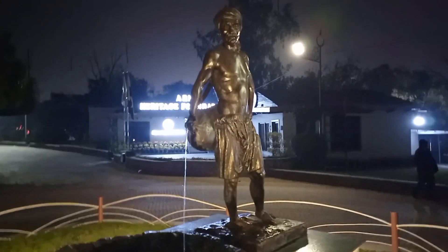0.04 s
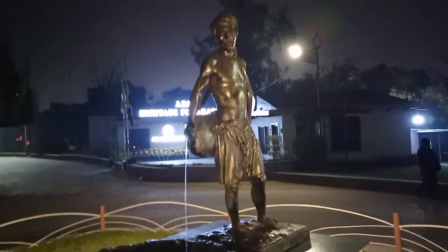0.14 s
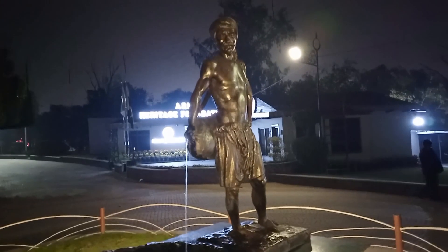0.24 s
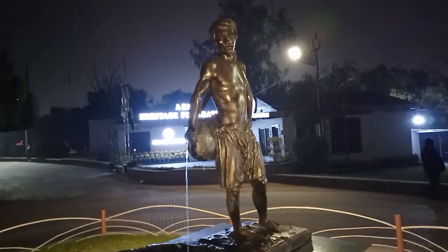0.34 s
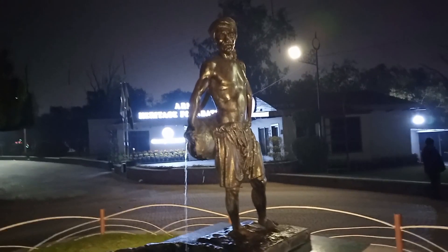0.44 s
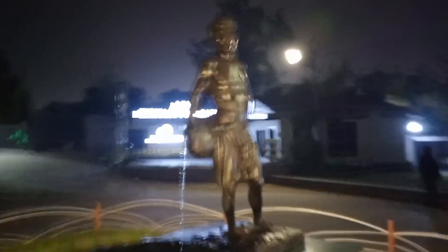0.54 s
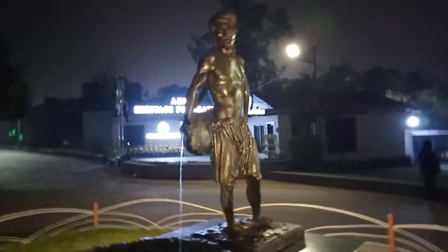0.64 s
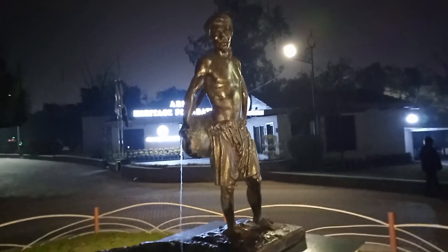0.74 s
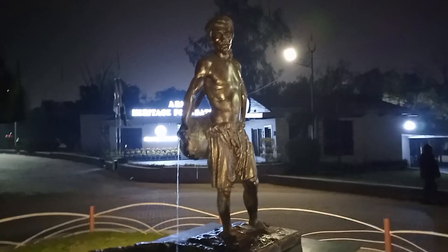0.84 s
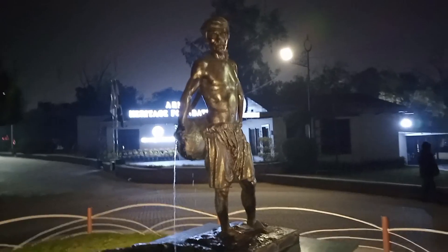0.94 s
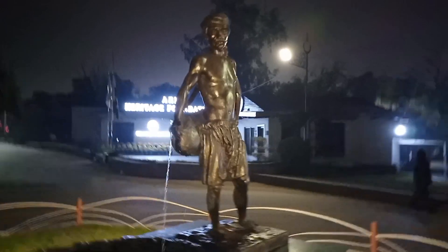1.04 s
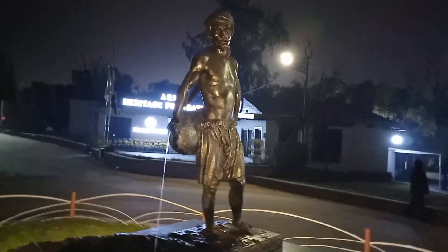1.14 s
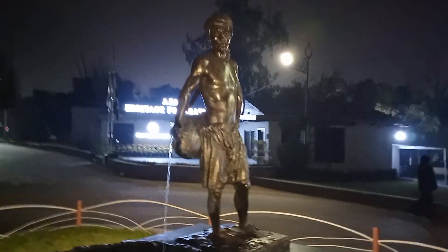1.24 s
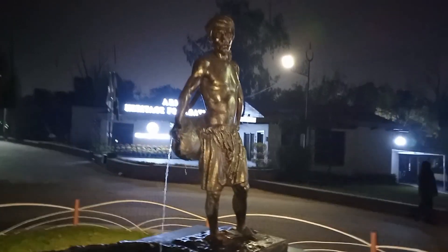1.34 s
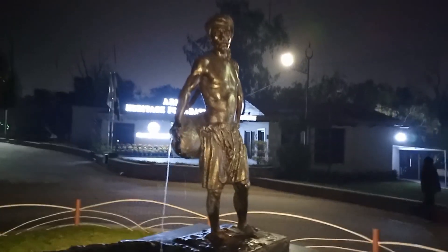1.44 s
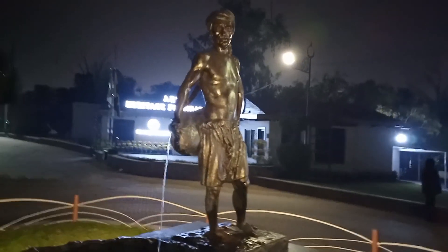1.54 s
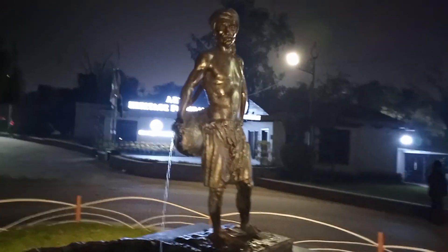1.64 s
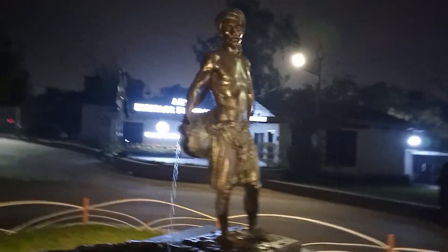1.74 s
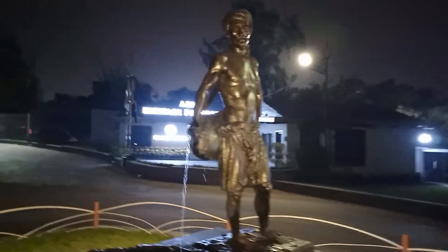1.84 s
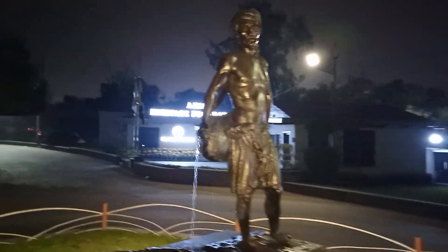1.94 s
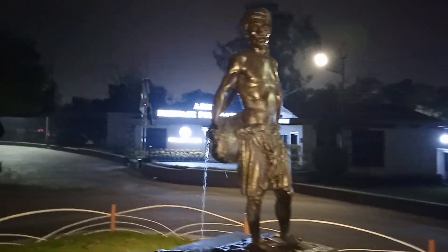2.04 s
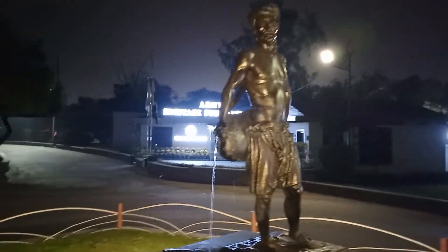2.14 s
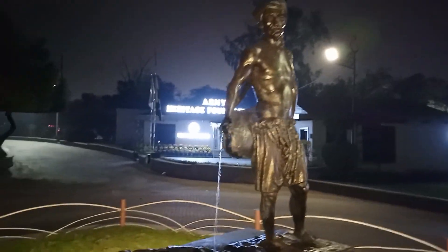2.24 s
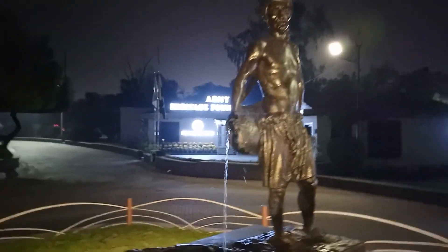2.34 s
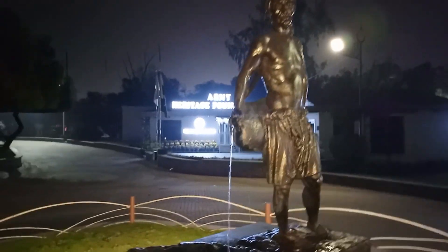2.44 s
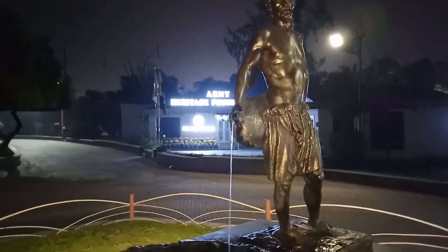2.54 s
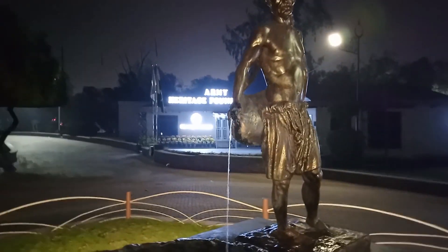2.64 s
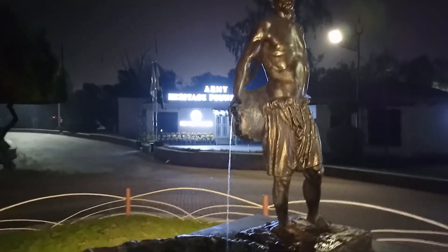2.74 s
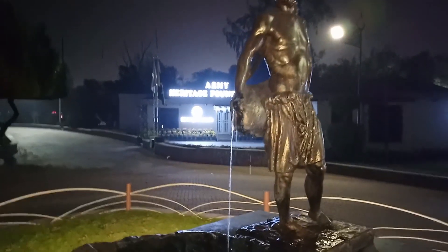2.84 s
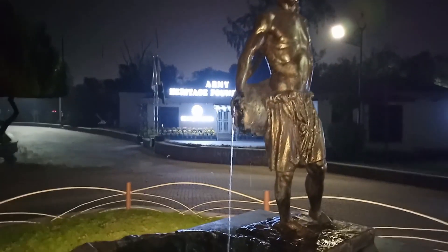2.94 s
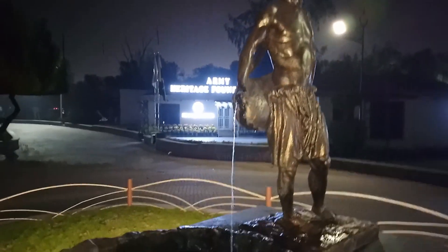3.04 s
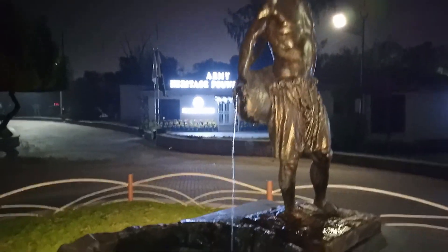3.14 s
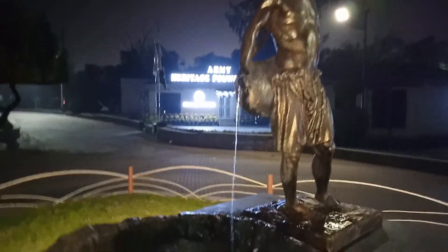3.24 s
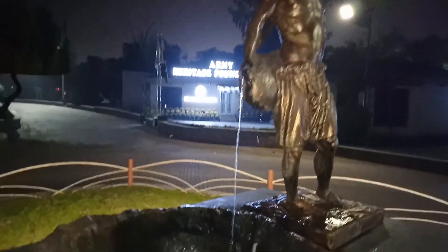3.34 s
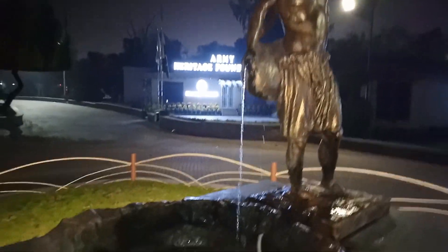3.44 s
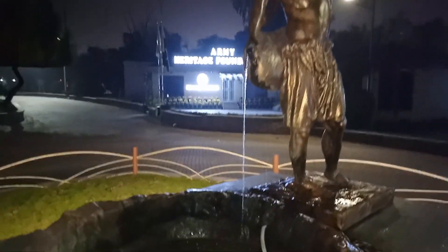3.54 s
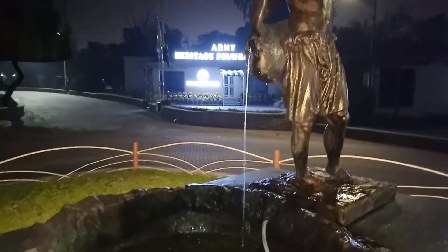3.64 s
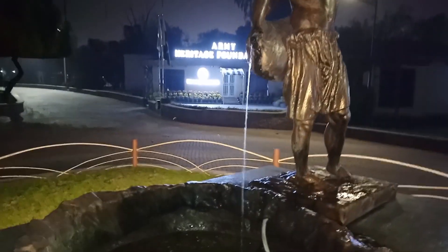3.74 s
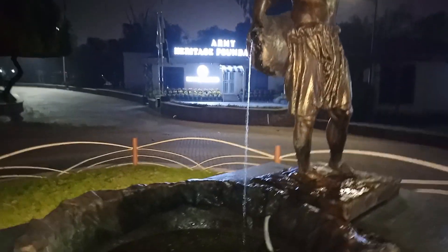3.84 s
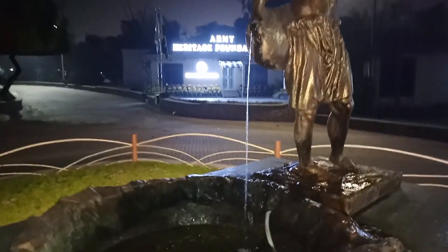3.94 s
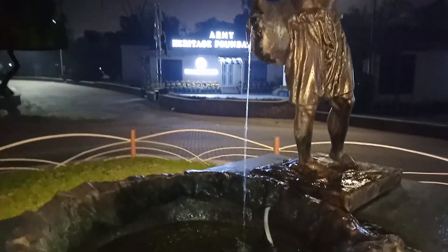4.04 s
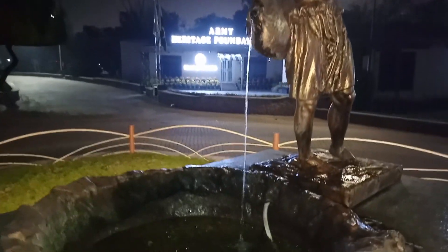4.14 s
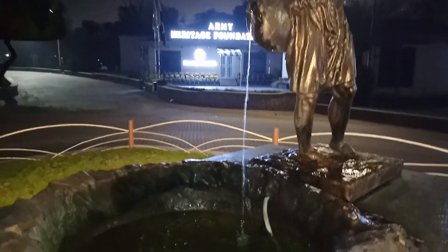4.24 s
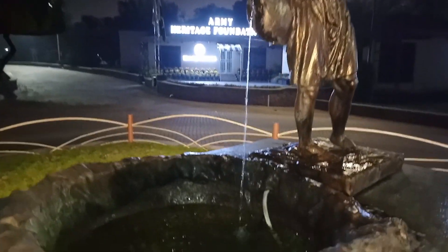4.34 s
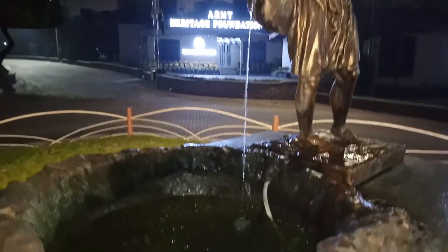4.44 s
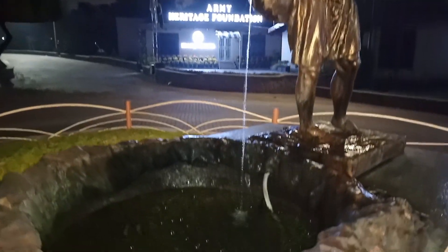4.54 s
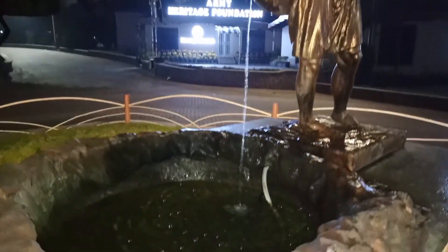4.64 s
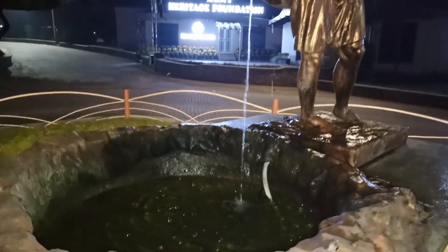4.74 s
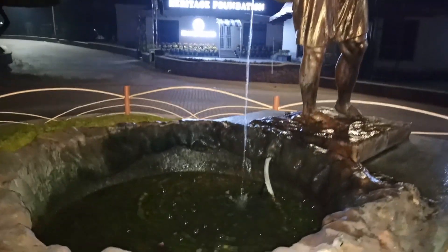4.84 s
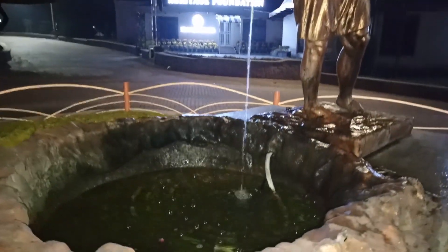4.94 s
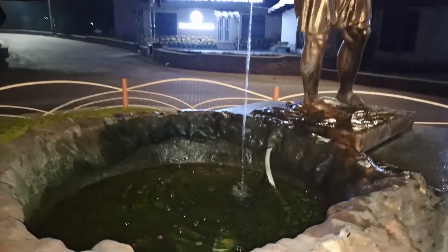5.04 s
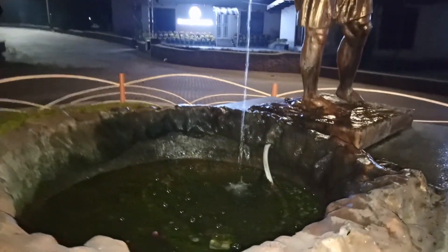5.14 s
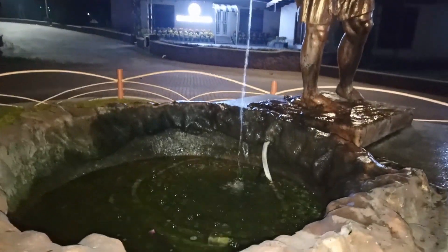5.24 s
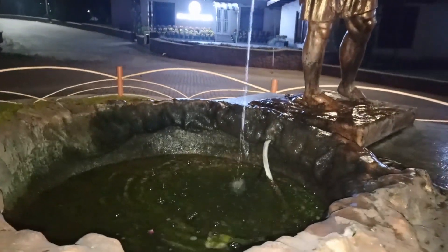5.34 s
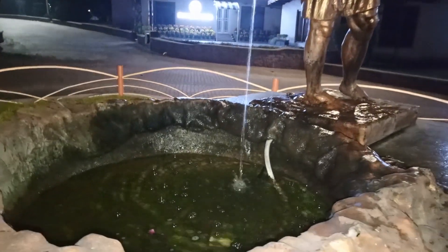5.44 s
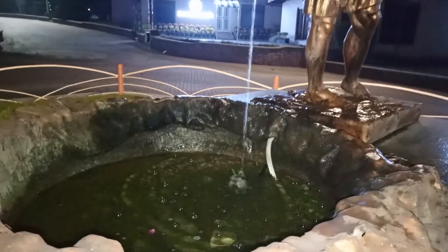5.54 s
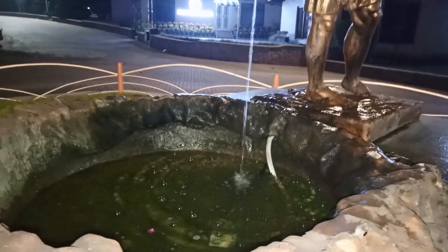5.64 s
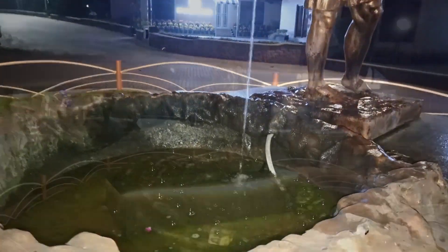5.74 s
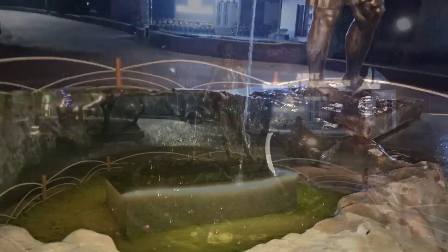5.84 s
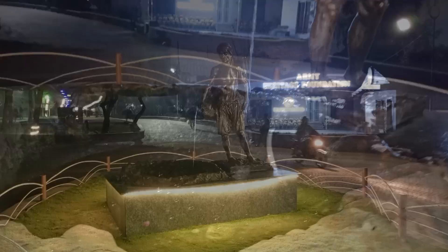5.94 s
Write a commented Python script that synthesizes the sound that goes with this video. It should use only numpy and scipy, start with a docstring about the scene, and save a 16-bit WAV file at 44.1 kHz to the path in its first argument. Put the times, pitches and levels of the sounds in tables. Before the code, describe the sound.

A thin stream of water splashes steadily into a stone basin, with bubbling, low glugs and a faint rumble.

```python
"""A thin stream falls into a stone basin at night and breaks into slugs of water. From the start each slug
cracks on the surface, throws spray and traps small bubbles; larger air pockets glug, the walls echo and
a noise gate cuts a low rumble in and out. From 0.7 s faint tones sound now and then. At 2.2-2.7 s the
microphone tips toward the water and treble notches from the rim fill in. The splashes are loudest from
about 4.3 s on."""
import sys
import numpy as np
from scipy import signal
from scipy.fft import rfft, irfft, next_fast_len
from scipy.io import wavfile
from scipy.ndimage import uniform_filter1d

SR = 44100
rng = np.random.default_rng(int(sys.argv[2]) if len(sys.argv) > 2 else 0)


def materialize(psi):
    """Save the field psi as 16-bit PCM at rate SR to the path in sys.argv[1].

    A 1-D psi becomes a single channel; in a 2-D psi each row is a channel.
    """
    bounded = np.clip(np.atleast_2d(psi).T, -1, 1)
    quanta = np.round(bounded * 32767).astype(np.int16)
    wavfile.write(sys.argv[1], SR, quanta)


N = 263718

# Slug impacts: start_s, level_db, pitch_hz, spray_db
SLUGS = [(0.023, -8.5, 2660, -25), (0.071, -6.5, 4120, -29), (0.0957, -26, 2210, -29),
         (0.172, -12.5, 2270, -37), (0.2, -13, 3440, -29), (0.2906, -7, 4490, -25),
         (0.3196, -16, 1720, -49), (0.3371, -11, 2120, -44), (0.382, -12, 4130, -32),
         (0.4546, -7.5, 1550, -19), (0.489, -16, 2100, -35), (0.51, -10, 2070, -20),
         (0.539, -13, 4500, -25), (0.6095, -10.5, 5340, -34), (0.5931, -8.5, 2200, -42),
         (0.626, -2.5, 3000, -21.5), (0.6821, -7.5, 3830, -38), (0.777, -16.5, 3420, -29),
         (0.8174, -11.5, 3840, -42), (0.85, -9, 1730, -36), (0.8713, -3.5, 5900, -19),
         (0.92, -6.5, 1520, -36), (0.946, -11.5, 1500, -30), (0.988, -17, 1710, -35),
         (1.0078, -8.5, 2830, -19), (1.0333, -9, 2070, -43), (1.077, -8, 2200, -48),
         (1.0955, -8, 3930, -30), (1.109, -7, 4800, -19), (1.228, -19, 2570, -33),
         (1.2535, -14.5, 1810, -29), (1.3207, -15, 3550, -39), (1.334, -11.5, 2040, -26),
         (1.3642, -14.5, 4410, -17), (1.423, -10.5, 3530, -44), (1.4426, -3, 3770, -22),
         (1.5253, -10, 4580, -28), (1.5713, -16, 3720, -52), (1.6, -11, 4970, -40),
         (1.6326, -9.5, 2550, -29), (1.643, -10, 4260, -35), (1.6797, -5, 4340, -22),
         (1.722, -12, 2230, -45), (1.7524, -9, 4570, -41), (1.7705, -9, 3470, -45),
         (1.8193, -9.5, 3470, -33), (1.8488, -1.5, 4170, -29), (1.871, -4.5, 3900, -23),
         (1.9516, -6, 4000, -13.5), (2.0236, -16, 4230, -28), (2.024, -23, 1860, -29),
         (2.04, -9.5, 1780, -36), (2.07, -15, 2820, -49), (2.086, -5.5, 1820, -43),
         (2.2166, -8.5, 4500, -40), (2.243, -12, 2390, -26), (2.2936, -12, 3500, -37),
         (2.369, -1.5, 2870, -22), (2.422, -3.5, 3470, -28), (2.4584, -12, 1850, -27),
         (2.4783, -13, 2720, -33), (2.509, -1, 1930, -39), (2.526, -9, 4440, -25), (2.5535, -14, 5360, -42),
         (2.564, -11, 2900, -44), (2.5947, -7, 2500, -17), (2.607, -5, 2380, -38), (2.6336, -6, 1540, -34),
         (2.6539, -6, 4220, -20), (2.7094, -9, 3780, -39), (2.724, -11, 3500, -18.5),
         (2.751, -12, 4960, -22), (2.8033, -6, 3950, -38), (2.8186, -4.5, 4100, -39),
         (2.8884, -4, 3140, -20), (2.93, -10, 2760, -36), (2.9505, -1.5, 3300, -31),
         (2.9756, -3.5, 3100, -21), (3.029, -5.5, 1750, -31), (3.04, -5.5, 2700, -27),
         (3.0584, -7, 3480, -21), (3.0894, -20.5, 4040, -36), (3.1134, -18, 3600, -22),
         (3.136, -21, 1640, -40), (3.169, -8.5, 1650, -25), (3.179, -5.5, 1450, -26),
         (3.2425, -4.5, 1800, -22), (3.326, -11, 1670, -26), (3.3625, -2.5, 2520, -15.5),
         (3.4008, -10.5, 4600, -19), (3.417, -1.5, 3860, -26), (3.4394, -3, 1860, -20),
         (3.463, -9, 3460, -22), (3.5137, -17, 4740, -25), (3.5286, -0.5, 3500, -28),
         (3.551, -12, 5360, -37), (3.582, -10.5, 3650, -31), (3.6368, -3, 3280, -24),
         (3.682, -6.5, 2890, -31), (3.6998, -12.5, 3260, -16), (3.7533, -8, 3260, -20.5),
         (3.7817, -1, 3600, -19), (3.811, -19, 2000, -44), (3.8247, -1.5, 3080, -17),
         (3.8586, -12, 3820, -21), (3.8792, -5.5, 2600, -38), (3.923, -11, 2570, -41),
         (3.9568, -5.5, 3600, -28), (3.986, -12, 2170, -33), (4, -5, 1900, -21), (4.067, -11, 3450, -26),
         (4.0961, -8, 3280, -27), (4.117, -6, 3430, -25), (4.142, -6.5, 3330, -28), (4.2016, -6, 4300, -24),
         (4.214, -4.5, 5080, -19), (4.2319, -3, 5160, -25), (4.243, -5.5, 3270, -42),
         (4.272, -9.5, 3730, -37), (4.2896, 1, 4100, -30), (4.3086, -6.5, 1740, -30),
         (4.338, -7.5, 1780, -29), (4.357, -7, 4970, -22), (4.385, -13, 5600, -26), (4.4016, -3, 2600, -39),
         (4.421, -4, 4800, -24), (4.496, -16, 3290, -31), (4.546, -20, 2510, -27), (4.5924, -18, 3590, -24),
         (4.6133, -0.5, 2750, -57), (4.6449, -5, 1670, -28), (4.6775, 1.5, 6400, -18),
         (4.7033, -8, 4500, -19), (4.7143, -13, 3300, -42), (4.726, -4.5, 1590, -32),
         (4.747, -3.5, 3540, -18.5), (4.7727, -8, 5270, -24), (4.803, -17, 3480, -42),
         (4.808, -3.5, 2130, -44), (4.824, 0.5, 2470, -33), (4.859, -11.5, 3500, -43),
         (4.8815, -2.5, 5500, -32), (4.9208, -9, 3280, -36), (4.9372, -5, 2500, -28),
         (4.957, -1.5, 3120, -25), (4.984, -12, 3360, -29), (4.999, -3, 2420, -30),
         (5.04, -10.5, 6000, -13), (5.092, -15, 3550, -33), (5.107, 1, 2820, -13), (5.1157, -2, 4400, -19),
         (5.13, -7.5, 5000, -29), (5.137, -5, 2100, -22), (5.179, -20, 1740, -31), (5.2052, -10, 4330, -34),
         (5.214, -0.5, 3120, -22), (5.226, -9, 3200, -22), (5.242, -4, 5000, -19),
         (5.2966, -1.5, 3570, -23), (5.328, -0.5, 3840, -24), (5.355, -2, 2800, -19), (5.393, 2, 2920, -30),
         (5.404, -1.5, 2200, -35), (5.426, -17, 1770, -20), (5.444, 0.5, 1866, -19),
         (5.4823, -3, 2400, -21), (5.508, -8.5, 5440, -22), (5.536, -8, 2410, -33),
         (5.5677, -3.5, 1680, -18.5), (5.5953, -7, 1570, -20), (5.625, -8, 4660, -21),
         (5.664, -4, 2170, -24), (5.7124, -2, 3070, -8), (5.7255, -1, 4240, -16), (5.7736, -6.5, 3240, -31),
         (5.8144, -15, 3530, -39), (5.8688, -12, 3260, -36), (5.8863, -7.5, 2440, -40),
         (5.909, -6, 3600, -41), (5.92, -2, 1940, -37), (5.943, -9.5, 3600, -16.5)]

def splashes():
    """Each slug hits the surface: a faint bubble, a dry tick, a puff of spray, a noisy crack."""
    start_s, level_db, pitch_hz, spray_db = np.transpose(SLUGS)
    ring = bubbles(start_s, level_db - 10.5, pitch_hz, t60_s=28 / pitch_hz, attack_s=0.00075,
                   climb=0.062, size=2048, shake=0.0024)
    tick = cracks(start_s, level_db - 13, pitch_hz, t60_s=0.003, attack_s=0.0001, size=256)
    puff = 0.35 * fade(0.017, 0.002, size=1536) + 0.72 * fade(0.001, 0.0001, size=1536)  # droplets + tick
    spray = placed(start_s, spray_db + 5, puff) * spray_hiss()
    crack = cracks(start_s, level_db - 13.5, pitch_hz, t60_s=0.026, attack_s=0.00069, size=1536)
    return ring + tick + crack + spray


# Crack and churn spectrum: freq_hz, density_db
WATER_SPECTRUM = [(850, -6.5), (1450, -2.5), (1750, 7), (3670, 4), (5300, 1.5), (6350, 1), (6900, -23.5),
                  (8300, -14), (10400, -23), (17600, -120)]

def cracks(start_s, level_db, pitch_hz, t60_s, attack_s, size):
    """Water lands in pieces: lumpy noise bursts, strongest near the bubble pitch."""
    freq_hz = np.fft.rfftfreq(size, 1 / SR)
    ratio = (freq_hz + 1) / pitch_hz[:, None]
    colour = amp(along(WATER_SPECTRUM, freq_hz)) / np.sqrt((0.97 * ratio) ** -5 + ratio ** 2.2)
    colour *= amp(5 * smooth_noise(colour.shape, 4))  # bubble cluster: narrow peaks
    noise = irfft(rfft(rng.standard_normal((len(start_s), size))) * colour, size)
    noise /= noise.std(1, keepdims=True)
    lumps = amp(1.52 * smooth_noise(noise.shape, 90))
    return placed(start_s, level_db, fade(t60_s, attack_s, size) * lumps * noise)


# Fine spray spectrum: freq_hz, density_db
SPRAY_SPECTRUM = [(4120, -5), (7000, 4.5), (8260, -11), (11100, 4.5), (13700, -5), (15200, -2.5),
                  (16100, 3), (16500, -27)]

def spray_hiss():
    """Fine droplets hiss in the high treble."""
    return rush(SPRAY_SPECTRUM, patch_db=4)


# Large air pockets: start_s, peak_db, pitch_hz, t60_s
AIR_POCKETS = [(0.0, -16, 457, 0.079), (0.054, -24, 442, 0.071), (0.135, -14.5, 455.5, 0.16),
               (0.226, -23.5, 410, 0.073), (0.379, -22, 432, 0.38), (0.509, -20.5, 396, 0.13),
               (0.79, -21, 613, 0.23), (1.032, -19, 417, 0.095), (1.11, -24.5, 496, 0.043),
               (1.408, -23.5, 569.5, 0.59), (1.601, -30, 504, 0.11), (1.912, -22.5, 416, 0.16),
               (1.969, -22, 480, 0.055), (2.071, -18.5, 335, 0.07), (2.398, -25, 277, 0.1),
               (2.67, -7, 268.4, 0.071), (2.862, -13.5, 403, 0.061), (2.94, -20, 483, 0.052),
               (3.47, -22, 302, 0.12), (3.551, -15, 485, 0.055), (3.717, -13, 272, 0.076),
               (3.753, -20, 275, 0.073), (3.835, -26, 400, 0.28), (3.893, -9.5, 465, 0.055),
               (4.022, -22, 522.3, 0.38), (4.068, -14.5, 431, 0.082), (4.201, -12.5, 482, 0.027),
               (4.356, -26.5, 413, 0.056), (4.405, -19, 400, 0.072), (4.611, -23.5, 407, 0.16),
               (4.716, -20.5, 464, 0.084), (4.843, -10.5, 244, 0.096), (4.944, -28.5, 240, 0.069),
               (5.046, -23, 273, 0.11), (5.293, -11, 482, 0.049), (5.484, -3.5, 279.6, 0.038),
               (5.54, -11, 485, 0.17), (5.612, -8, 480, 0.089), (5.821, -24, 350, 0.11),
               (5.914, -10, 399, 0.051), (3.491, -17, 451, 0.069), (3.514, -13, 518, 0.032),
               (0.073, -23, 1270, 0.04), (0.449, -19.5, 996, 0.11), (0.922, -25.5, 1497, 0.043),
               (1.171, -25, 1327, 0.082), (1.334, -25, 1223, 0.075), (2.087, -22.5, 1320, 0.17),
               (2.368, -26.5, 1453, 0.27), (2.696, -14, 1390, 0.1), (2.776, -24, 913, 0.066),
               (2.864, -22, 1310, 0.088), (2.931, -13.5, 1426, 0.026), (3.133, -24, 865, 0.15),
               (3.182, -15, 1330, 0.032), (3.215, -18.5, 1430, 0.031), (3.303, -22, 1030, 0.064),
               (3.583, -32, 1350, 0.061), (3.635, -25.5, 1040, 0.082), (3.684, -15, 1043, 0.027),
               (3.863, -20, 1410, 0.055), (4.387, -18.5, 1340, 0.084), (4.646, -25, 1320, 0.14),
               (4.678, -14, 993, 0.019), (4.717, -15, 1210, 0.094), (4.983, -28, 914, 0.044),
               (5.065, -31, 1460, 0.083), (5.213, -15.5, 885, 0.034), (5.353, -15, 897, 0.035),
               (5.427, -16.5, 907, 0.056), (5.578, -4.5, 1170, 0.008), (5.913, -17, 1200, 0.053)]

def glugs():
    """Trapped air swells and rings low, smaller pockets faster; lesser ones come at random."""
    start_s, gain_db, pitch_draw = patter(count=40, spread_db=8.5)
    churn_db = np.interp(start_s, *np.transpose(STREAM_LEVELS)[:2])
    lesser = [start_s, churn_db - 7 + gain_db, 300 * 4.8 ** pitch_draw, np.full(len(start_s), 0.062)]
    start_s, peak_db, pitch_hz, t60_s = np.hstack([np.transpose(AIR_POCKETS), lesser])
    attack_s = 0.085 * (450 / pitch_hz[:, None]) ** 1.8
    lead_s, shake_hz = 0.004, 37.4
    return bubbles(np.abs(start_s - lead_s), peak_db, pitch_hz, t60_s, attack_s,
                   climb=0.06, size=6144, shake=shake_hz / pitch_hz[:, None])


# Stirred water: time_s, churn_db, gurgle_db, burble_db
STREAM_LEVELS = [(0.0, -28.5, -35.5, -45.5), (0.75, -30.5, -43, -44.5), (0.95, -29.5, -31, -32),
                 (1.43, -27.5, -32.5, -50), (1.85, -28, -39.5, -41), (2.33, -30, -32, -41.5),
                 (2.58, -25.5, -52, -40.5), (2.88, -27, -39.5, -28.5), (3.23, -27.5, -45.5, -31.5),
                 (4.0, -27, -33, -31.5), (4.38, -27.5, -37, -34), (4.75, -24, -57, -38.5),
                 (5.13, -24, -32, -32), (5.46, -27, -42, -26.5), (5.71, -26.5, -79, -35),
                 (5.98, -24.5, -25, -47)]

def stirred_water():
    """The stream keeps the water sounding between slugs."""
    churn_db, gurgle_db, burble_db = curves(STREAM_LEVELS)
    return churn(churn_db) + fizz(churn_db) + burble(burble_db) + gurgle(gurgle_db)


def churn(level_db):
    """Small drops patter over churning hiss and mist, both thinning in short lulls."""
    start_s, gain_db, pitch_draw = patter(count=500, spread_db=2.5)
    lull = wander(0.011)
    hiss = amp(level_db - 7 + 4.3 * lull) * rush(WATER_SPECTRUM, patch_db=33, streak_db=14.5)
    drops = cracks(start_s, gain_db - 9.5, 1300 * 4 ** pitch_draw, t60_s=0.02, attack_s=0.0013, size=1024)
    drop_pulses = placed(start_s, gain_db, fade(0.0072, 0.0016, size=2048))
    mist_db = -40 + 0.5 * (level_db - level_db.mean()) + 3.6 * lull
    mist = amp(mist_db) * (0.51 + 1.04 * drop_pulses) * spray_hiss()
    return hiss + amp(level_db) * drops + mist


def fizz(churn_db):
    """Small bubbles ring at random, following the churn's level."""
    start_s, gain_db, pitch_draw = patter(count=450, spread_db=1.5)
    pitch_hz = 1100 * 4 ** pitch_draw
    rings = bubbles(start_s, gain_db, pitch_hz, t60_s=50 / pitch_hz, attack_s=0.0016,
                    climb=0.12, size=2048, shake=0.0041)
    return amp(churn_db - 5.5) * rings


# Burble spectrum: freq_hz, density_db
BURBLE_SPECTRUM = [(420, -54), (720, -33), (884, 4.5), (1120, -3.5), (1260, 4), (1500, -5), (1950, -47),
                   (3300, -120)]

def burble(level_db):
    """Stirred water near 1 kHz, in quick random swells."""
    return amp(level_db + 4.4 * wander(0.053)) * rush(BURBLE_SPECTRUM, patch_db=19, streak_db=17.5)


# Gurgle spectrum: freq_hz, density_db
GURGLE_SPECTRUM = [(110, -73), (180, -11.5), (275, -20.5), (387, -1.5), (455, 3.5), (598, -2), (720, -10),
                   (940, -83), (1580, -120)]

def gurgle(level_db):
    """Stirred water near 450 Hz, in slower swells."""
    return amp(level_db + 3 * wander(0.075)) * rush(GURGLE_SPECTRUM, patch_db=12, streak_db=9)


# Wall echo decay: freq_hz, t60_s
WALL_DECAY = [(300, 0.097), (2000, 0.056), (10000, 0.003)]
# Basin resonances: centre_hz
BASIN_MODES = [1547, 1756, 2206, 2501, 2860, 3544, 3780, 4200, 4438, 4950, 6200]

def basin(x):
    """Stone walls add a short tail and ring at fixed pitches."""
    freq_hz, time_s, spectra = signal.stft(rng.standard_normal(SR // 4), SR, nperseg=256)
    decay = amp(-60 * time_s / along(WALL_DECAY, freq_hz)[:, None])
    tail = signal.istft(spectra * decay, SR, nperseg=256)[1]
    echo = signal.fftconvolve(np.pad(x, (130, 0)), tail / np.linalg.norm(tail))[:N]

    def resonance(hz, width_hz=70):
        damping = 1j * hz * width_hz
        return 1 + amp(3.5) * sum(damping / (mode ** 2 - hz ** 2 + damping) for mode in BASIN_MODES)
    return filtered(x + amp(-14) * echo, resonance)


# Rim cancellations, constant: centre_hz, half_width_hz, gain_db
RIM_NOTCHES = [(700, 50, -8), (1160, 50, -8), (1480, 60, -6), (1910, 50, -10), (2280, 30, -11),
               (2600, 40, -5), (3050, 60, -7)]
# Rim cancellations, water hidden: centre_hz, half_width_hz, gain_db
HIDDEN_NOTCHES = [(3250, 70, -9), (3920, 60, -6), (4320, 60, -7), (4690, 80, -11), (5140, 80, -9),
                  (5480, 70, -8), (5870, 130, -9)]

def rim(x, tilt_s=(2.2, 2.7)):
    """The rim cancels narrow bands, fewer once the microphone tips toward the water."""
    exposed = notched(x, RIM_NOTCHES)
    hidden = notched(exposed, HIDDEN_NOTCHES)
    tipped = np.interp(np.arange(N) / SR, tilt_s, (0, 1))
    return tipped * exposed + (1 - tipped) * hidden


# Faint tones: start_s, end_s, start_hz, end_hz, level_db, waver_ratio
TONES = [(0.71, 1.58, 605, 596.7, -39, 0), (1.884, 2.04, 790, 780, -36, 0.01),
         (3.31, 3.593, 990, 960, -35, 0), (4.436, 4.568, 576, 730, -29, 0.02),
         (4.508, 4.759, 794, 1000, -33, 0.09), (5.31, 5.522, 781, 772, -27, 0.03)]

def held_tones():
    """Faint fluttering tones, nearly steady or gliding up."""
    time_s, tones = np.arange(N) / SR, np.zeros(N)
    for start_s, end_s, start_hz, end_hz, level_db, waver_ratio in TONES:
        progress = np.clip((time_s - start_s) / (end_s - start_s), 0, 1)
        waver = 1 + waver_ratio * smooth_noise(N, 900)
        pitch_hz = (start_hz + (end_hz - start_hz) * progress) * waver
        flutter_db = 3.5 * wander(0.02)
        arch = np.sqrt(2 * np.sin(np.pi * progress).clip(0))
        tones += amp(level_db + flutter_db) * arch * np.sin(2 * np.pi * np.cumsum(pitch_hz) / SR)
    return tones


# Gated rumble levels: time_s, deep_db, upper_db
RUMBLE_LEVELS = [(0.0, -38, -26), (0.13, -29, -48), (0.22, -56, -43.5), (0.42, -21, -18),
                 (0.51, -22, -20.5), (0.68, -60, -38), (0.77, -23, -18.5), (0.87, -42, -40),
                 (0.96, -45, -19.5), (1.03, -26, -37), (1.18, -32, -21), (1.51, -44, -38), (1.6, -19, -21),
                 (1.65, -29, -19), (2.25, -45.5, -43.5), (2.28, -22.5, -41), (3.1, -25, -19),
                 (3.2, -22, -28.5), (3.73, -43, -26.5), (3.85, -76, -49), (4.16, -23, -22.5),
                 (4.23, -56, -29.5), (4.28, -15, -23.5), (4.35, -40, -23.5), (4.41, -18, -20),
                 (4.76, -48, -29), (5.18, -30, -19), (5.28, -20.5, -39), (5.35, -44, -33.5),
                 (5.61, -27, -18.5), (5.65, -43, -26.5), (5.98, -35, -31.5)]
# Deep band spectrum: freq_hz, density_db
DEEP_SPECTRUM = [(18, -49), (30, -20), (50, -11), (62, -12.5), (70, 12), (82, -14.5), (100, -4.5),
                 (130, -21), (220, -120)]
# Upper band spectrum: freq_hz, density_db
UPPER_SPECTRUM = [(53, -38), (90, -5.5), (137, 2.5), (183, -10), (210, -16.5), (270, -21), (460, -120)]

def rumble():
    """A low rumble in two bands, cut in and out abruptly by a noise gate at the listed times."""
    deep_db, upper_db = curves(RUMBLE_LEVELS)
    flicker_db = 2.5 * wander(0.019)
    deep = amp(deep_db + flicker_db) * rush(DEEP_SPECTRUM, patch_db=-2)
    upper = amp(upper_db + flicker_db) * rush(UPPER_SPECTRUM, patch_db=2.5)
    return deep + upper


def bubbles(start_s, peak_db, pitch_hz, t60_s, attack_s, climb, size, shake):
    """Damped sines; pitch climbs as a bubble nears the surface and shakes with the stirred water."""
    age_s = np.arange(size) / SR
    bend = 1 + climb * age_s / t60_s[:, None] + shake * smooth_noise((len(start_s), size), 200)
    tone = np.sin(2 * np.pi * np.cumsum(pitch_hz[:, None] * bend, 1) / SR)
    return placed(start_s, peak_db, fade(t60_s, attack_s, size) * tone)


def rush(spectrum, patch_db, streak_db=0):
    """Noise of rms 1 with short wide patches and long narrow streaks of random gain."""
    spectra = signal.stft(rng.standard_normal(N), nperseg=1024)[2]

    def blur(bins, frames):
        field = rng.standard_normal(spectra.shape)
        return unit(uniform_filter1d(uniform_filter1d(field, bins, 0), frames, 1))
    gain_db = patch_db * blur(bins=12, frames=3) + streak_db * blur(bins=3, frames=14)
    gain_db = np.minimum(gain_db, 4)  # gaps run deeper than swells rise
    noise = signal.istft(spectra * amp(gain_db), nperseg=1024)[1][:N]
    return unit(filtered(noise, lambda hz: amp(along(spectrum, hz))))


def patter(count, spread_db):
    """Random events: start_s, gain_db, pitch_draw (0-1)."""
    when, strength, pitch_draw = rng.random((count, 3)).T
    return when * N / SR, -spread_db * np.log(strength + 0.14), pitch_draw


def placed(start_s, gain_db, shapes):
    """Sum of short shapes, each at its own start and gain."""
    size = shapes.shape[1]
    index = np.round(start_s * SR).astype(int)[:, None] + np.arange(size)
    scaled = amp(gain_db)[:, None] * shapes
    return np.bincount(index.ravel(), scaled.ravel(), N + size)[:N]


def fade(t60_s, attack_s, size):
    """Envelopes with an exponential rise and fall, peak 1."""
    age_s = np.arange(size) / SR
    envelope = amp(-60 * age_s / np.reshape(t60_s, (-1, 1))) * (1 - np.exp(-age_s / attack_s))
    return envelope / envelope.max(1, keepdims=True)


def wander(turn_s):
    """Smooth random curve of rms 1, turning in about turn_s."""
    width = round(turn_s * SR)
    return unit(uniform_filter1d(smooth_noise(N, width), width))


def smooth_noise(shape, width):
    return unit(uniform_filter1d(rng.standard_normal(shape), width))


def notched(x, notches):
    return filtered(x, lambda f: amp(sum(db / (1 + ((f - hz) / width) ** 2) for hz, width, db in notches)))


def filtered(x, response):
    size = next_fast_len(N + SR // 2)
    return irfft(rfft(x, size) * response(np.fft.rfftfreq(size, 1 / SR)), size)[:N]


def curves(rows):
    """One value per sample for each column after time_s."""
    time_s, *columns = np.transpose(rows)
    return [np.interp(np.arange(N) / SR, time_s, column) for column in columns]


def along(points, hz):
    """Interpolate (freq_hz, value) points on a log axis."""
    freq_hz, values = np.transpose(points)
    return np.interp(np.log(hz + 1), np.log(freq_hz + 1), values)


def amp(db):
    return 10 ** (np.asarray(db) / 20)


def unit(x):
    return x / np.sqrt(np.mean(x ** 2) + 1e-20)


def scene():
    """Water in the basin, heard past the rim, over faint tones and rumble; mono."""
    water = splashes() + stirred_water() + glugs()
    return (rim(basin(water)) + held_tones() + rumble())[None]


def record(dry):
    """Peaks flatten at full scale; nothing passes above the band limit."""
    top_hz = 15850
    limited = dry[0] / (1 + np.abs(dry[0]) ** 8) ** (1 / 8)
    return filtered(limited, lambda hz: hz < top_hz)[None]


dry = scene()
out = record(dry)
materialize(out)
```